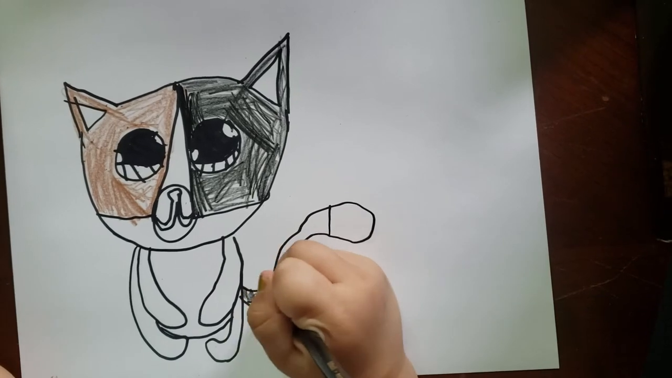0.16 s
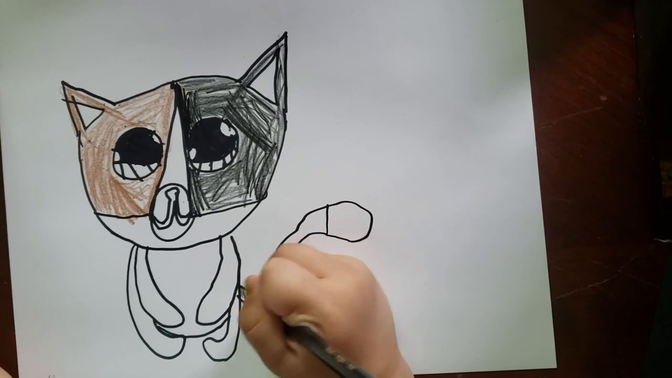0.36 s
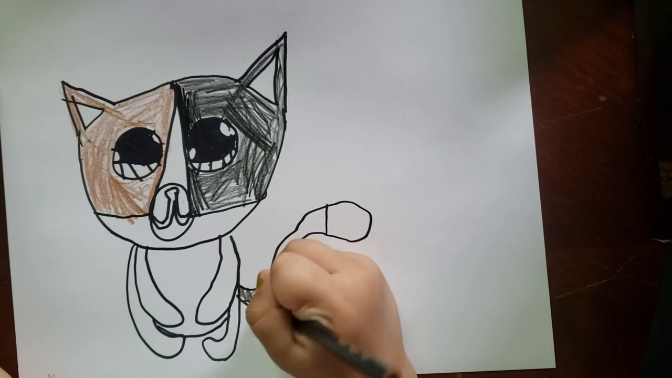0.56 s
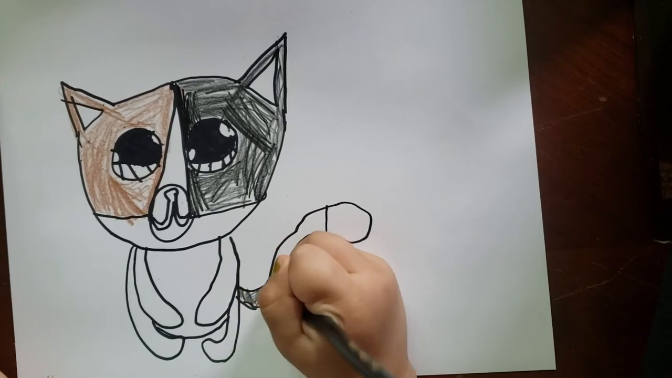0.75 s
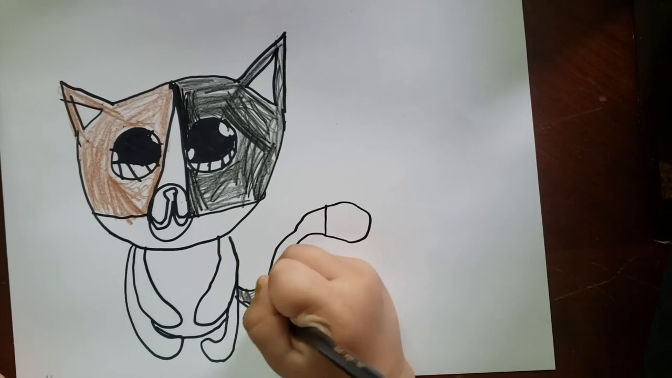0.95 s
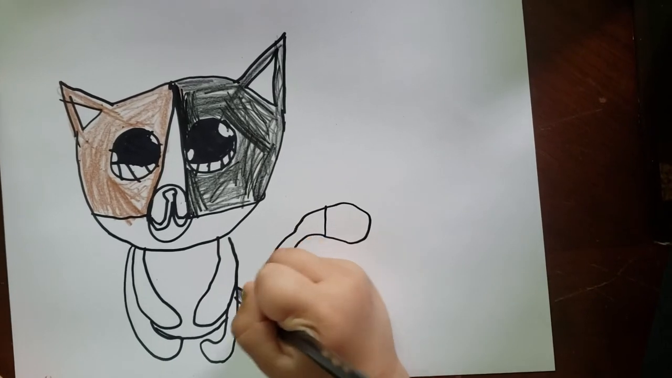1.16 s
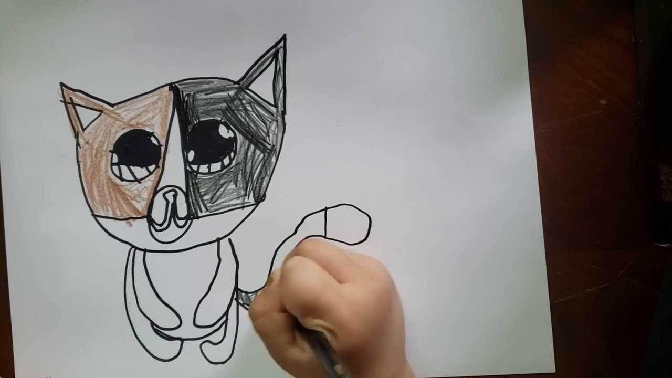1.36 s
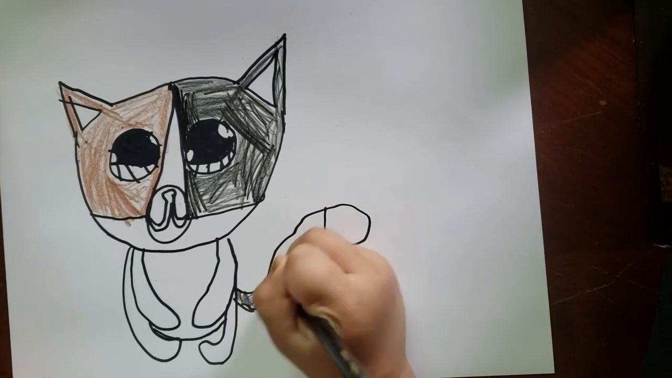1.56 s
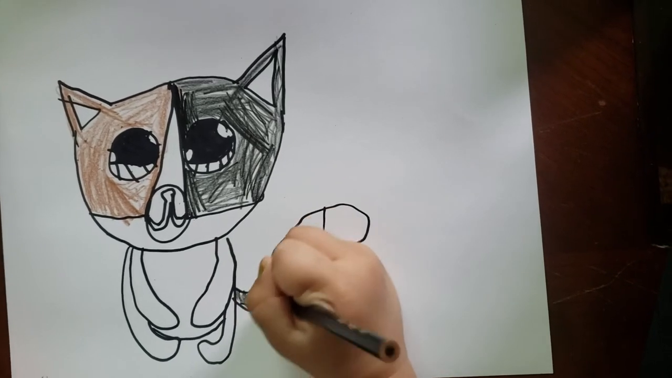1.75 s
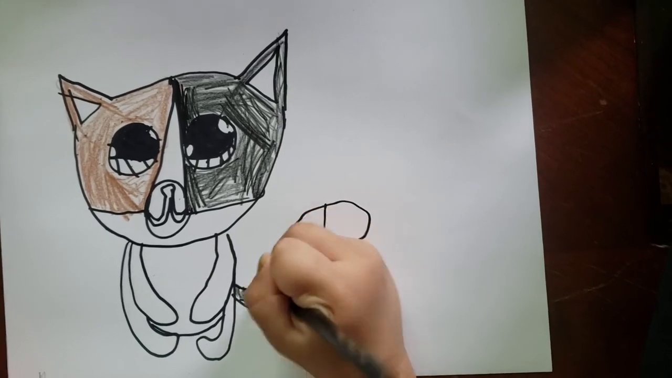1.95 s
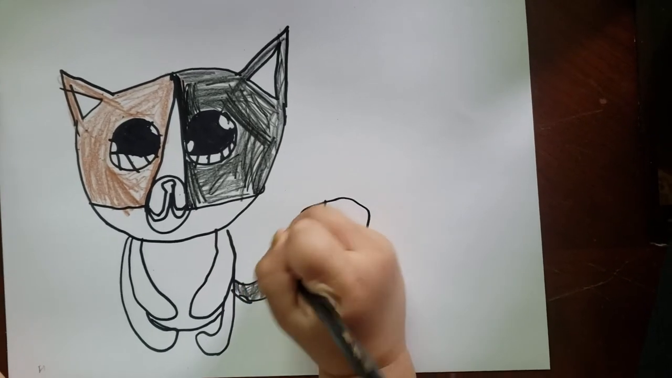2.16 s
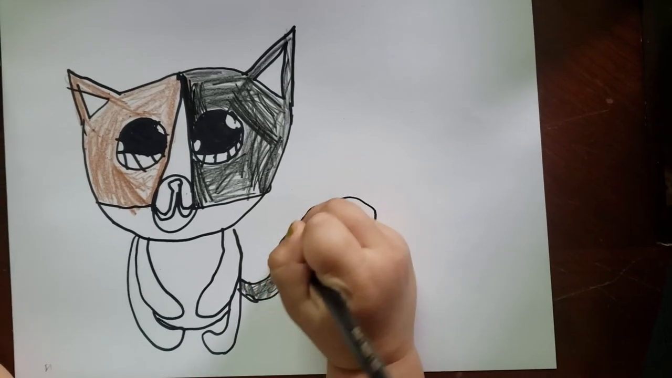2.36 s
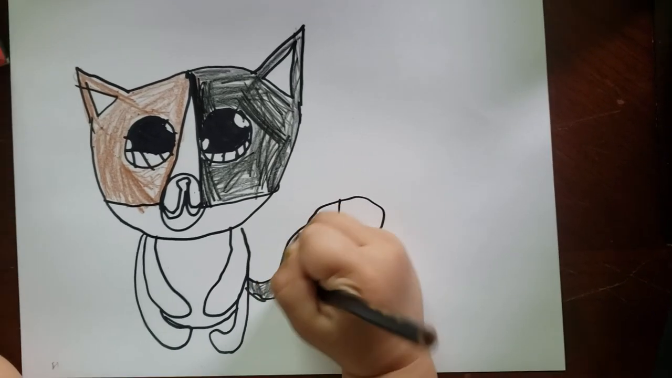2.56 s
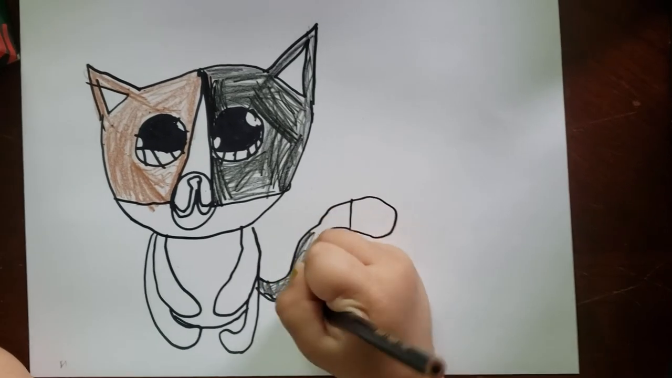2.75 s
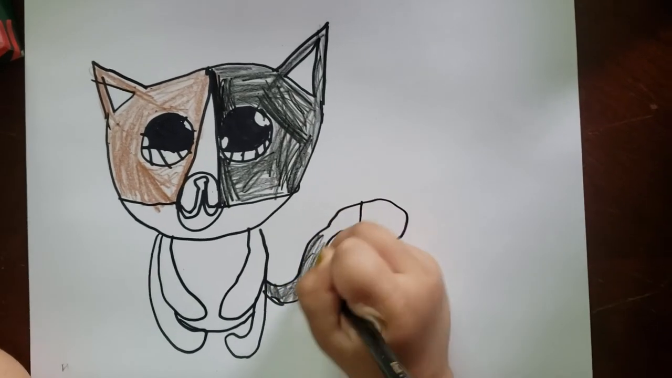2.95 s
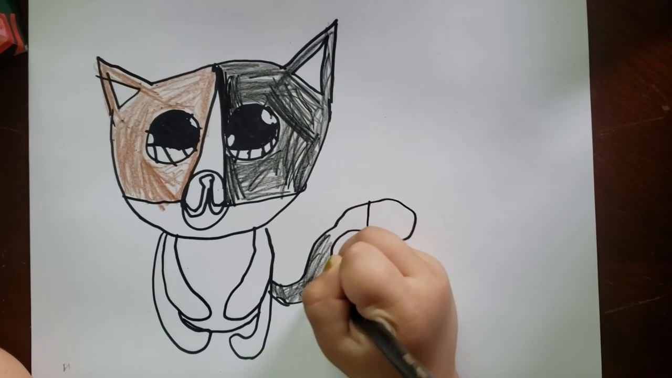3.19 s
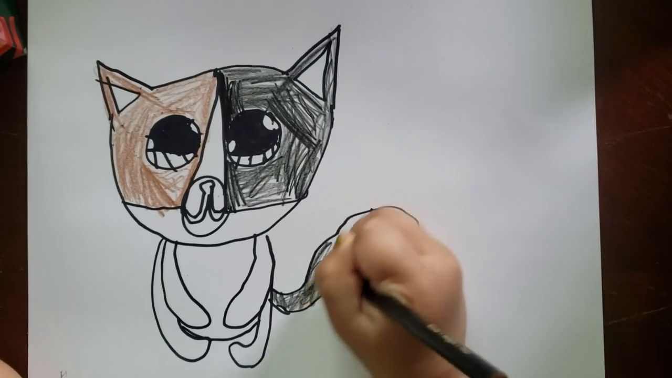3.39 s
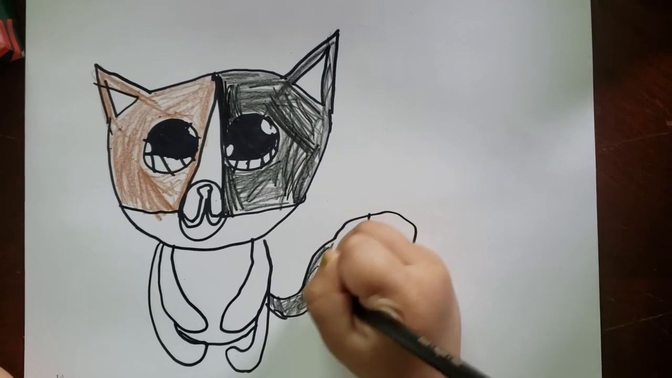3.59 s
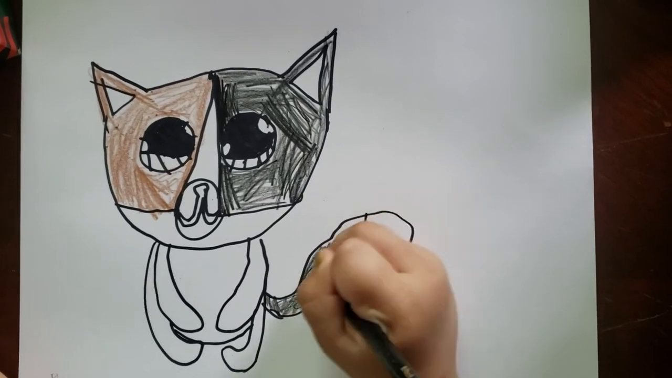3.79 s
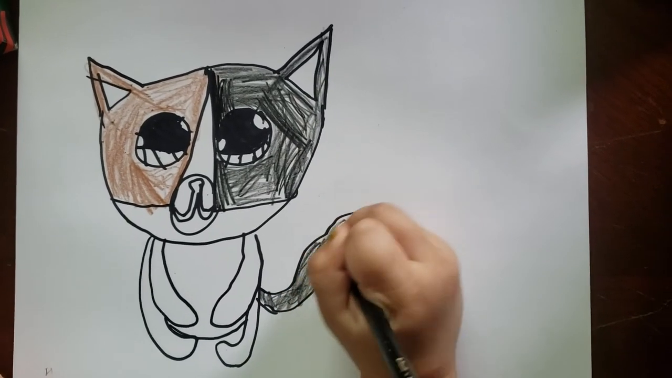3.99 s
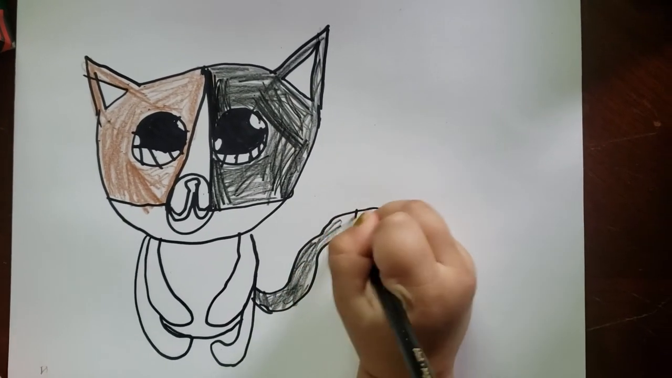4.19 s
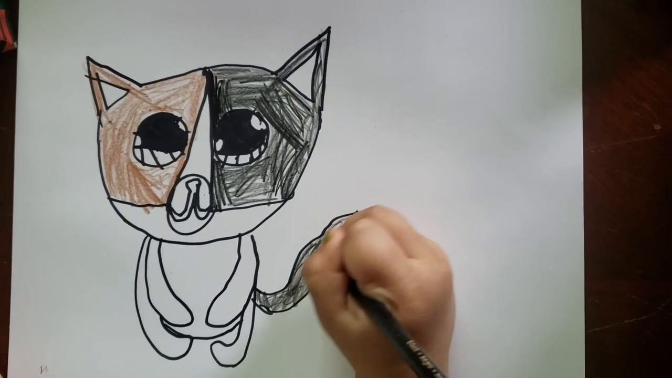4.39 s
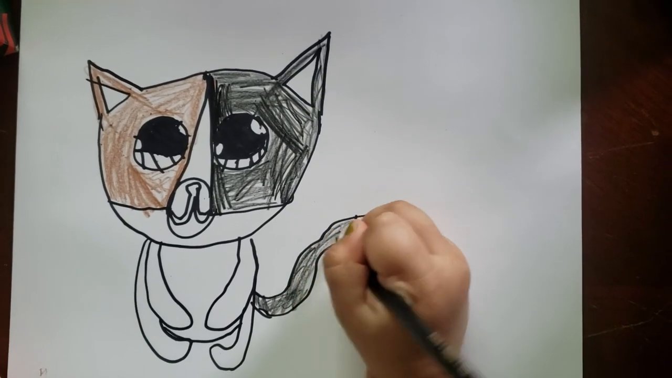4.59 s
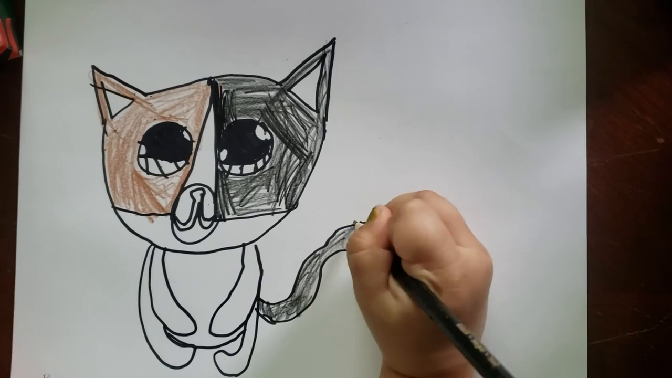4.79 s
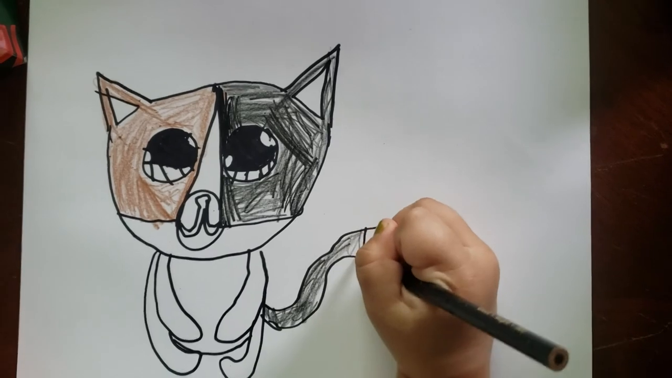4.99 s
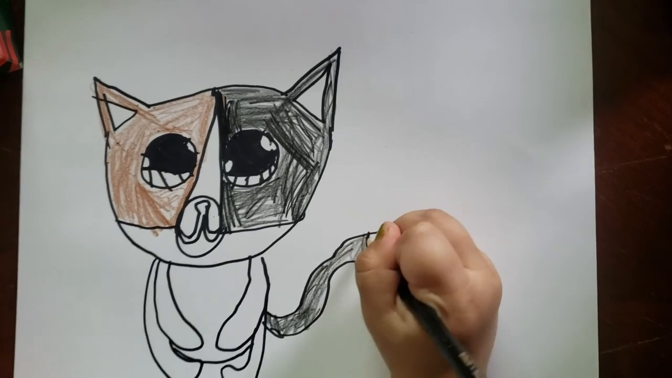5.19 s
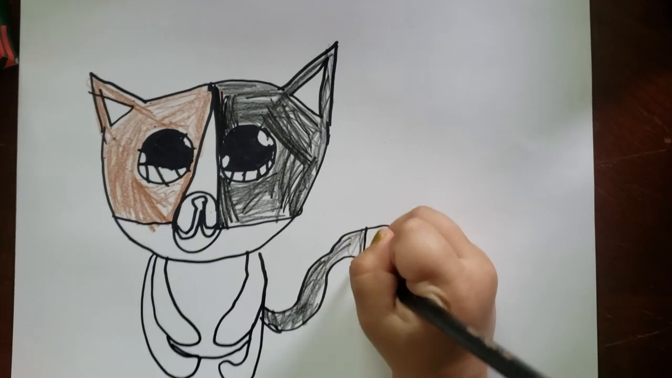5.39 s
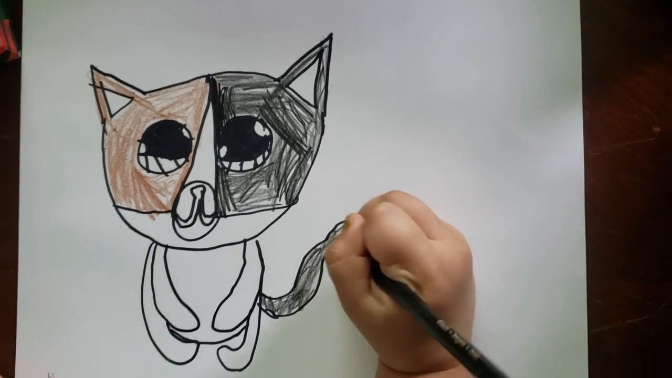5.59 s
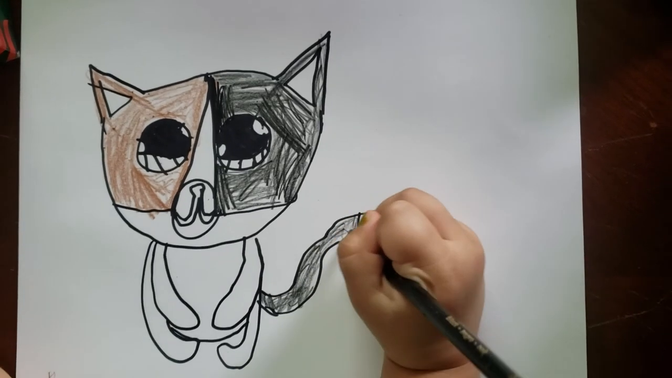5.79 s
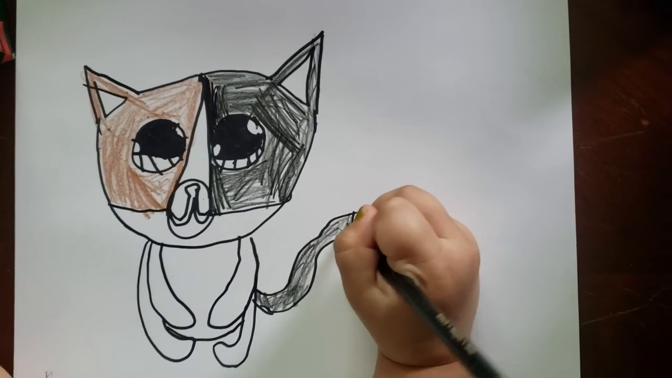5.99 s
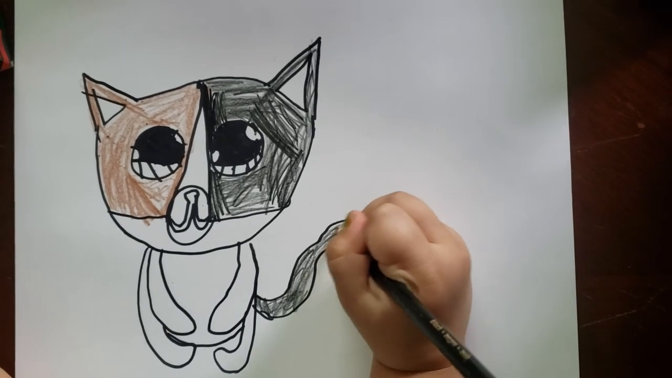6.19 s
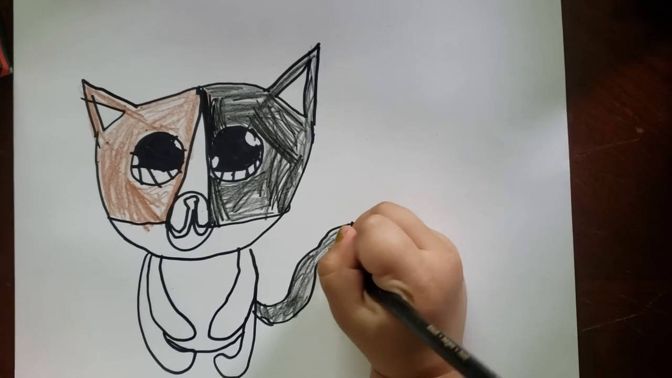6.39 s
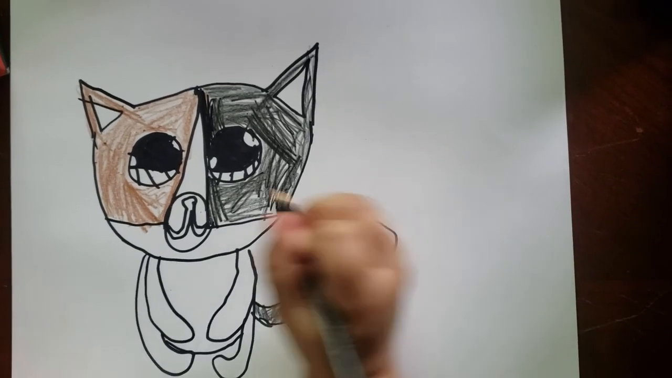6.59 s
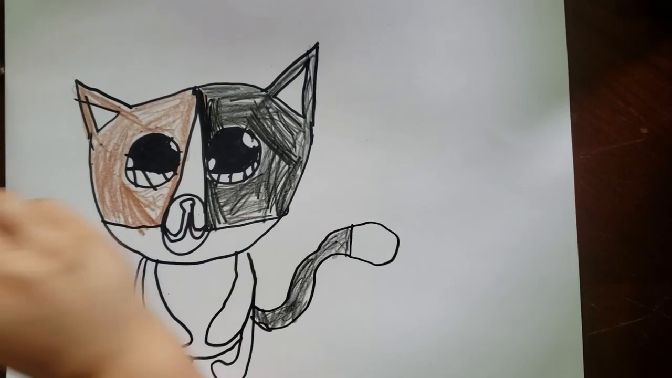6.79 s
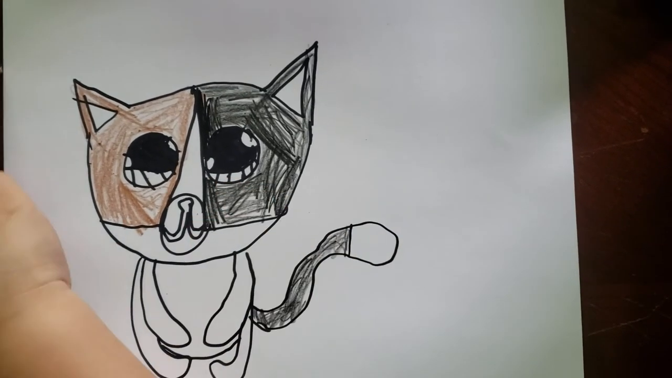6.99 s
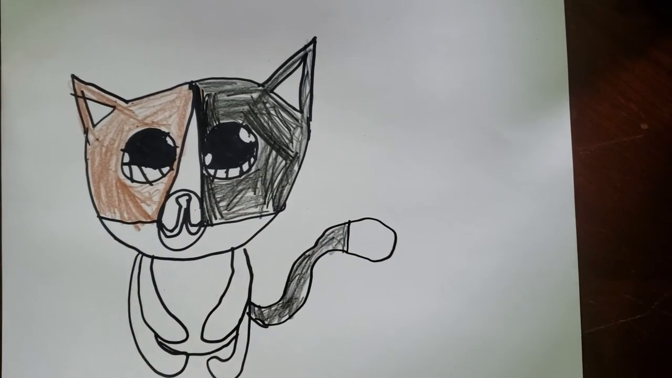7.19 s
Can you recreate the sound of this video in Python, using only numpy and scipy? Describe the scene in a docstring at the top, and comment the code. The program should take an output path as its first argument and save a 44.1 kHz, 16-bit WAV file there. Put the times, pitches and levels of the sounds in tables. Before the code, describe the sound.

A close stereo perspective on a wooden table in a small, lightly reverberant room. From 0 s, very faint, dry crayon strokes rub to and fro on paper, roughly eight per second, grainy and sizzling, with a narrow shaft rasp around 3 kHz. At about 1.0 s bright ticks snap, with a soft thump and a tiny rising creak until 1.1 s; duller table bumps follow near 1.4 s and a faint upward squeak at 1.7 s. Shading is firmer from 1.8 to 4.4 s, briefly weakening around 3.2 s, then lighter and slower. Low rumble and a muffled traffic-like rush swell, mostly between 2.5 and 4.2 s, over thin hiss. A soft little knock and scuff come at 5.2 s. Strokes stop at 6.73 s; a hand swishes quickly across the sheet, peaking near 6.85 s. At 7.11 s the crayon lands with a loud wooden crack and bright ring, bouncing at 7.19 and 7.24 s.

```python
"""A child shades a drawing with a pencil crayon in short back-and-forth strokes on a wooden table.
The tip snags on paper fibres and the held shaft rasps; ticks, bumps, a creak and a squeak join in.
A low room rumble is joined by a slowly swelling far rush, like traffic outside, over a faint hiss.
At the end the hand sweeps over the sheet and drops the crayon, which bounces and rings.
Most layers are shaped noise; the knocks, thuds and the ring of the crayon are fading sine waves."""
import sys
import numpy as np
from scipy import signal
from scipy.fft import rfft, irfft, next_fast_len
from scipy.io import wavfile

SR = 44100
rng = np.random.default_rng(int(sys.argv[2]) if len(sys.argv) > 2 else 0)


def store_wav(level_fs):
    """Save 16-bit WAV to argv[1]."""
    pcm = np.round(np.clip(np.atleast_2d(level_fs), -1, 1) * 32767)
    wavfile.write(sys.argv[1], SR, pcm.T.astype(np.int16))


N = 319725
TIME = np.arange(N) / SR   # seconds
LEFT_RIGHT = np.array([[1], [-1]])   # plus for the left side, minus for the right

# Strokes, push and pull in turn, each lasting until the next begins. Each row: start in seconds,
# relative level in dB, extra sizzle over body in dB, share of the stroke at which it is fastest.
STROKES = [(0.003, -59.0, 3.5, 0.53), (0.115, -69, 5.5, 0.33), (0.325, -66, 3.5, 0.49),
           (0.445, -65.0, 4.5, 0.61), (0.586, -68.5, 0, 0.56), (0.708, -73, 4, 0.85),
           (0.808, -69.5, -1, 0.51), (0.926, -63, -2, 0.66), (1.056, -64, 0, 0.49), (1.181, -62, -1.5, 0.6),
           (1.312, -61, 3, 0.59), (1.433, -65, -1.5, 0.55), (1.583, -62, -1, 0.68),
           (1.735, -60.5, -1.5, 0.49), (1.853, -58.5, -2.5, 0.71), (1.981, -57.5, -0.5, 0.45),
           (2.112, -60.0, -1, 0.64), (2.235, -59.0, 0.0, 0.48), (2.359, -59, -2.5, 0.58),
           (2.489, -60.0, -2.5, 0.36), (2.629, -61, -1.5, 0.97), (2.764, -56.0, 1.5, 0.31),
           (2.9, -59.5, -0.5, 0.55), (3.044, -58.5, -1.5, 0.42), (3.178, -67.5, -2, 0.49),
           (3.319, -69.5, -2.5, 0.36), (3.422, -59, -3.5, 0.59), (3.579, -62, -1.5, 0.48),
           (3.696, -57.5, -3, 0.73), (3.809, -56, -3, 0.48), (3.935, -59, -2.5, 0.42),
           (4.062, -60, -2, 0.42), (4.187, -60, -1, 0.99), (4.325, -58.5, -1.5, 0.55),
           (4.464, -64, -0.5, 0.7), (4.605, -66.5, -5, 0.95), (4.714, -67, -1, 0.43),
           (4.921, -69.5, -1, 0.41), (5.119, -78, -1.0, 0.57), (5.155, -69, -2, 0.34),
           (5.351, -69.5, 0, 0.46), (5.523, -68, 1, 0.51), (5.77, -66, 3, 0.45), (5.868, -65.0, 1, 0.61),
           (5.992, -65.5, 2, 0.54), (6.095, -69.5, -2, 0.62), (6.244, -77.5, -2, 0.38),
           (6.397, -76.5, -5, 0.5), (6.568, -67.5, 1, 0.7)]
LIFT_OFF_S = 6.73   # the last stroke ends
# How alike sound from all round is on the two sides. Each row: frequency in Hz, coherence (1 = alike).
LIKENESS = [(30, 0.9), (120, 0.98), (290, 0.94), (640, 0.064), (1400, 0.013), (14000, 0.079)]


def from_db(db):
    """Turn decibels into a gain."""
    return 10 ** (np.asarray(db) / 20)


def rms_one(x):
    """Scale a sound to an average power of one."""
    return x / np.sqrt(np.mean(x ** 2) + 1e-20)


def in_time(rows):
    """Read each column of a curve at every sample, joining its points with straight lines."""
    seconds, *columns = np.transpose(rows)
    return [np.interp(TIME, seconds, column) for column in columns]


def at_hz(points, hz):
    """Read a curve over frequency, with the frequencies spaced as the ear hears them (log axis)."""
    f, value = np.transpose(points)
    return np.interp(np.log(np.maximum(hz, 1)), np.log(f), value)


def filtered(x, gain):
    """Apply a gain given as a function of frequency."""
    size = next_fast_len(N + SR // 10)
    hz = np.arange(size // 2 + 1) * SR / size
    return irfft(rfft(x, size) * gain(hz), size)[..., :N]


def coloured(x, spectrum):
    """Give a white signal a spectrum and an average power of one."""
    return rms_one(filtered(x, lambda hz: from_db(at_hz(spectrum, hz))))


def drift(rate):
    """Wander by chance along straight lines, with so many new points a second; rms 1."""
    knots = rng.standard_normal(N // 20)
    return rms_one(np.interp(TIME * rate, np.arange(len(knots)), knots))


def resonance(f, hz, width_hz):
    """Bell-shaped gain of a resonance, 1 on top and half at half the width to either side."""
    return 1 / (1 + (2 * (f - hz) / width_hz) ** 2)


def resonant_noise(hz, width_hz):
    """Send noise through a resonance; rms 1."""
    return rms_one(filtered(rng.standard_normal(N), lambda f: resonance(f, hz, width_hz)))


def gliding_noise(hz, width_hz):
    """Make noise in a resonance whose centre moves; rms 1."""
    a, b = filtered(rng.standard_normal((2, N)), lambda f: resonance(f, 0, width_hz))
    phase = 2 * np.pi * np.cumsum(hz) / SR
    return rms_one(a * np.cos(phase) + b * np.sin(phase))


def scattered(likeness):
    """White noise from a spread-out source, only partly alike at the two microphones."""
    share = np.clip(likeness, 0, 1)
    common = np.sqrt(share) * rng.standard_normal(N)
    return common + np.sqrt(1 - share) * rng.standard_normal((2, N))


def diffuse(spectrum):
    """Noise from all round: alike on both sides in the bass, nearly unrelated in the treble."""
    def gain(hz):
        likeness = np.clip(at_hz(LIKENESS, hz), -1, 1)
        return from_db(at_hz(spectrum, hz)) * np.sqrt(1 + likeness * LEFT_RIGHT)
    mid, side = filtered(rng.standard_normal((2, N)), gain)
    return rms_one(np.array([mid + side, mid - side]))


def placed(x, pan_db, lag_ms):
    """Place a sound by level (left over right) and by delay of the left side (negative: earlier)."""
    lag_s = np.array([[lag_ms], [0]]) / 1000
    pair = filtered(x, lambda hz: np.exp(-2j * np.pi * hz * lag_s))
    return pair * from_db(pan_db * LEFT_RIGHT / 2)


def decay(s, t60, attack_s):
    """Envelope that rises at s and then falls by 60 dB in t60 seconds."""
    out, start = np.zeros(N), int(s * SR)
    t = TIME[:min(SR // 4, N - start)]
    out[start:start + len(t)] = np.minimum(t / attack_s, 1) * from_db(-60 * t / t60)
    return out


def swell(start_s, peak_s, rise_db_per_s, release_s, attack_s=0.0046):
    """A rub sets in, grows steadily louder and is cut short as the contact lifts."""
    onset = np.clip((TIME - start_s) / attack_s, 0, 1)
    rise = rise_db_per_s * (TIME - peak_s)
    fall = -60 * (TIME - peak_s) / release_s
    return onset * from_db(np.maximum(np.minimum(rise, fall), -120))


def struck(s, modes, spread_db):
    """One blow rings every mode as a fading sine wave, with a strength of its own."""
    out, start = np.zeros(N), int(s * SR)
    t = TIME[:min(SR // 3, N - start)]
    for hz, db, t60 in modes:
        strength_db = db + spread_db * rng.standard_normal()
        out[start:start + len(t)] += from_db(strength_db - 60 * t / t60) * np.sin(2 * np.pi * hz * t)
    return out


def background(rumble_db=1.5, rush_db=2.5, hiss_db=-76, waver_db=0.66, rush_waver_db=1.28):
    """Wavering room rumble, the far rush and a faint even hiss, all noise from all round."""
    # Courses of loudness. Each row: time in seconds, level in dB before the shift set above.
    rumble_course = [(0, -67.5), (.7, -61), (2.4, -60.5), (2.9, -57), (4.2, -55.5), (5.6, -56.5),
                     (7.1, -54)]
    rush_course = [(0, -83.5), (.9, -84.5), (2.75, -72.5), (3.6, -72), (4.2, -64), (5.9, -65), (7.1, -65)]
    # Colours of the three noises. Each row: frequency in Hz, relative level in dB per Hz.
    rumble_colour = [(20, -12), (50, -13.5), (66, -4), (88, 3), (100, -10.5), (116, 4.5), (150, -7.5),
                     (190, -5), (235, -7.5), (330, -17.5), (470, -26.5), (900, -59.5)]
    rush_colour = [(150, -8.5), (350, 2), (700, 3), (1150, 1.5), (1450, -4), (1800, -3), (2100, -11),
                   (2500, -24.5), (4000, -43)]
    hiss_colour = [(300, 8), (1000, -1), (2400, -0.5), (3000, -1.5), (4500, -6), (5900, -10.5), (6450, 6),
                   (7300, -11), (8800, -17), (10500, -6.5), (12300, 1), (14500, -0.5)]
    rumble_level_db = in_time(rumble_course)[0] + rumble_db + waver_db * drift(6.8)
    rumble = from_db(rumble_level_db) * diffuse(rumble_colour)
    rush_level_db = in_time(rush_course)[0] + rush_db + rush_waver_db * drift(20)
    rush = from_db(rush_level_db) * diffuse(rush_colour)
    hiss = from_db(hiss_db) * diffuse(hiss_colour)
    return rumble + rush + placed(hiss, pan_db=1.0, lag_ms=0)


def hand_motion(turn_speed=0.17):
    """Pushes and pulls alternate, slowest on each turn, where the tip loops round at turn_speed.

    Gives stroke number and speed (about 1 at its fastest)."""
    starts, _, _, fastest = np.transpose(STROKES)
    turns = np.r_[starts, LIFT_OFF_S]
    fastest_s = starts + np.clip(fastest, 0, 1) * np.diff(turns)
    moments = np.sort(np.r_[turns, fastest_s])
    progress = np.interp(TIME, moments, np.arange(len(moments)) / 2)   # grows by 1 a stroke
    speed = np.hypot(np.sin(np.pi * progress), turn_speed) * (TIME < LIFT_OFF_S)
    return np.minimum(progress.astype(int), len(STROKES) - 1), speed


def contact(ease_s=0.049, bite_s=.008, ease_db=-13):
    """On some turns the tip eases off the paper, then bites again abruptly."""
    # Moments, in seconds, at which the tip is back in the paper.
    bites = [0.021, 2.008, 2.256, 2.51, 2.788, 3.846, 4.354, 4.644, 5.202, 5.38, 5.591]
    eased = sum(np.interp(TIME, [s - ease_s, s - bite_s, s], [0, 1, 0]) for s in bites)
    return from_db(ease_db * np.sqrt(eased))


def near_echoes(x, count=4, echo_db=-13, sway_s=.00004):
    """Table, hand and fingers reflect within a few milliseconds; the delays sway as the hand moves."""
    out, samples = x.copy(), np.arange(N)
    for side in range(2):
        swaying = np.interp(samples - sway_s * SR * drift(8), samples, x[side])
        for lag in (rng.uniform(0.000598, .004, count) * SR).astype(int):
            out[side, lag:] += from_db(echo_db) * swaying[:N - lag]
    return out / np.sqrt(1 + count * from_db(echo_db) ** 2)   # keep the power about the same


def shaft_rasp(pulling, grip):
    """The held shaft adds a narrow rasp, lower and stronger on a push, wandering with the grip."""
    push_hz, pull_hz, width_hz, wander_hz = 2950, 3120, 420, 80
    push_db, pull_db, spread_db = -14.5, -17.5, 1.5   # against the rub; spread from stroke to stroke
    hz = np.where(pulling, pull_hz, push_hz) + wander_hz * drift(10)
    level_db = np.where(pulling, pull_db, push_db) + spread_db * grip
    return gliding_noise(hz, width_hz) * from_db(level_db)


def shading(sharpness=1.17, grain_db=1.0, grip_db=1.5, level_db=0.57, sizzle_hz=10800, wander_db=0.7):
    """The tip snags on paper fibres at a rate that follows its speed, slowing at each turn."""
    # Colour of the tip rubbing on paper. Each row: frequency in Hz, relative level in dB per Hz.
    rub_colour = [(300, 2), (900, -14), (1900, -3.5), (2500, -10.5), (2950, -9), (3500, -6.5),
                  (4500, -13.5), (5300, -8), (5800, -5.5), (6400, -4.5), (7600, -2), (8200, -6),
                  (10000, -7.5), (11200, -4), (12200, 3.5), (14500, 3.5)]
    _, db, sizzle_db, _ = np.transpose(STROKES)
    stroke, speed = hand_motion()
    grip = rng.standard_normal(len(db))[stroke]
    pressure = from_db(db[stroke] + grip_db * drift(90)) * contact()
    # up to 12000 snags a second, of uneven strength
    snags = rng.random(N) < 12000 * speed / SR
    snags = snags * from_db(grain_db * np.minimum(rng.exponential(1, N), 4))
    # the whole sheet radiates, so each snag reaches each side with its own strength
    rub = coloured(snags * scattered(likeness=0.16), rub_colour)
    # the edge of the tip sizzles, its flat rubs duller; the tip rocks between strokes and within them
    sizzle = filtered(rub, lambda hz: 1 / (1 + (sizzle_hz / np.maximum(hz, 1)) ** 10))
    body = rub - sizzle
    edge = from_db((sizzle_db[stroke] + wander_db * drift(32)) / 2)
    rasp = placed(shaft_rasp(stroke % 2, grip) * speed, pan_db=0.5, lag_ms=-0.051)
    rub = near_echoes(sizzle * edge + body / edge + rasp)
    return placed(from_db(level_db) * rub * pressure * speed ** sharpness, pan_db=-2.5, lag_ms=0.159)


def ticks(t60=0.011, ring_cycles=26, rise_cycles=3):
    """The tip catches and lets go with a short snap; low snaps start softer and ring longer."""
    # Each row: start in seconds, level in dB, centre frequency in Hz.
    snaps = [(1.0052, -45, 12500), (1.006, -57, 3100), (1.006, -53, 5300), (1.0071, -46, 11100),
             (1.008, -34, 12100), (1.016, -44, 12500), (1.0216, -44, 11600), (1.074, -46, 12100),
             (1.076, -54, 11100), (1.08, -47, 12000), (1.083, -55, 11100), (5.202, -68, 12000)]
    out, t = np.zeros(N), TIME[:SR // 10]
    f = np.arange(len(t) // 2 + 1) * SR / len(t)
    for s, db, hz in snaps:
        noise = rfft(rng.standard_normal(len(t)))
        snap = rms_one(irfft(noise * resonance(f, hz, hz / 2), len(t)))
        rise = np.minimum(t * hz / rise_cycles, 1)
        start = int(s * SR)
        out[start:start + len(t)] += snap * rise * from_db(db - 60 * t / (t60 + ring_cycles / hz))
    return placed(out, pan_db=-6.0, lag_ms=0.274)


def table_thud(s, low_hz=150, top_hz=600):
    """A blow rings the table top, which radiates little deep bass."""
    # Modes of the table top. Each row: frequency in Hz, level in dB, t60 in seconds.
    table_modes = [(188, -9.5, 0.153), (225, -4, 0.048), (300, -5.5, 0.094), (353, 2, 0.026),
                   (455, -9.5, 0.03), (640, -14, .03), (850, -10, 0.027)]
    band = signal.butter(2, [low_hz, top_hz], "band", fs=SR, output="sos")
    return signal.sosfilt(band, struck(s, table_modes, spread_db=1.0) + 1e-18)


def bumps(low_hz=150, attack_s=0.0029, damped_t60=0.088):
    """Blows of the hand ring the table top and damp it at once; each reaches up to its own edge."""
    # Each row: start in seconds, level in dB, upper edge in Hz.
    blows = [(1.006, -49, 280), (1.022, -48, 250), (1.367, -40.5, 237), (1.382, -45, 337),
             (1.408, -56, 747)]
    thuds = 0
    for s, db, top_hz in blows:
        thuds = thuds + from_db(db) * table_thud(s, low_hz, top_hz) * decay(s, damped_t60, attack_s)
    return placed(thuds, pan_db=0.5, lag_ms=0.091)


def creak(grit_db=-3, slips_per_s=900, slip_t60=.003, level_db=-65.5):
    """The dragging tip slips in quick uneven jerks and excites the resonances of the held crayon."""
    # Each row: frequency in Hz, width in Hz, level in dB.
    creak_modes = [(840, 460, -3.5), (2180, 410, -5.5), (4000, 2800, -14), (11000, 600, -4)]
    tone = sum(from_db(db) * resonant_noise(hz, width_hz) for hz, width_hz, db in creak_modes)
    # every slip is a sudden jump that dies away within milliseconds
    jumps = (rng.random(N) < slips_per_s / SR) + 1e-18
    slips = signal.lfilter([1], [1, -from_db(-60 / (slip_t60 * SR))], jumps)
    grit = from_db(grit_db) * rms_one(slips * resonant_noise(13000, 9000))
    envelope = swell(start_s=1.01, peak_s=1.072, rise_db_per_s=25, release_s=0.036)
    return placed(from_db(level_db) * envelope * (tone + grit), pan_db=-5.5, lag_ms=0.38)


def squeak(width_hz=130):
    """A faint, narrow squeak of gliding noise that holds its pitch and then bends upward."""
    # Each row: time in seconds, pitch in Hz, level in dB.
    course = [(1.68, 1150, -95), (1.705, 1130, -74), (1.722, 1154, -73), (1.738, 1516, -80),
              (1.76, 1600, -95)]
    hz, db = in_time(course)
    sounding = (TIME > course[0][0]) & (TIME < course[-1][0])
    return placed(sounding * from_db(db) * gliding_noise(hz, width_hz), pan_db=3, lag_ms=0)


def soft_knock(start_s=5.202, knock_db=-54.5, scuff_db=-63, scuff_t60=0.19):
    """A soft little knock rings a few short, close modes and trails off in a scuff of noise."""
    # Each row: frequency in Hz, level in dB, t60 in seconds.
    knock_modes = [(1120, -2, 0.1), (1180, 1, 0.057), (1309, -2, 0.036), (1630, -14, .03)]
    # Each row: frequency in Hz, relative level in dB per Hz.
    scuff_colour = [(600, -11), (1150, 5), (1700, -8), (2300, -19), (3000, -13), (4500, -26)]
    knock = from_db(knock_db) * struck(start_s, knock_modes, spread_db=2.5)
    scuff = from_db(scuff_db) * coloured(rng.standard_normal(N), scuff_colour)
    return placed(knock + scuff * decay(start_s, scuff_t60, attack_s=0.0044), pan_db=0, lag_ms=0)


def sweep(level_db=-56.5):
    """Skin brushes across the paper, louder and louder until the hand lifts."""
    # Each row: frequency in Hz, relative level in dB per Hz.
    sweep_colour = [(500, -1), (3000, -10.5), (7000, -3), (10000, -10.5), (14500, 1)]
    envelope = swell(start_s=6.73, peak_s=6.845, rise_db_per_s=155, release_s=0.092)
    return from_db(level_db) * envelope * coloured(scattered(likeness=0.17), sweep_colour)


def dropped_crayon(crack_t60=0.019, crack_attack_s=0.00063, echo_s=.016, echo_db=-11):
    """Each landing cracks, rings the wooden shaft and thuds in the table; a nearby wall throws it back."""
    first_bounce_s = 7.15
    # The crayon lands on one end, then the other. Each row: start in seconds, crack level in dB,
    # ring level in dB, thud level in dB, left over right in dB.
    landings = [(7.107, -14.5, -33, -43.5, -3), (7.1108, -13.5, -30.5, -32.5, 2.5),
                (7.19, -18.5, -35, -45, 5), (7.1921, -20, -26.5, -39, -4), (7.2402, -21, -44, -48, -5),
                (7.2411, -31, -29.5, -50, -2)]
    # Modes of the crayon, which weigh differently as it lands flat or skips on its ends. Each row:
    # frequency in Hz, level in the first fall in dB, level in the bounces in dB, t60 in seconds.
    crayon_modes = [(1970, -16, -26, .2), (2135, 0, -8, 0.035), (2400, -15, -12, 0.031),
                    (2770, -12, -9.5, 0.033), (3380, -11, -2.5, 0.039), (4090, -6, -5, .025),
                    (4310, -20, -25, .16), (4600, -19, -14, 0.045), (4860, -8, -14, .035),
                    (6020, -13, -4, 0.051), (6280, 6, 0.5, 0.04), (7230, 1, -14, .022),
                    (7670, -22, -16, .06), (9050, 0, -20, 0.021), (11970, -16, -10, 0.035),
                    (12520, -8, 0, 0.021)]
    # Crack of wood on wood, in the first fall and in the lighter bounces. Each row: frequency in Hz,
    # relative level in dB per Hz.
    fall_colour = [(100, -28), (280, -1.5), (700, -1), (1150, -9.5), (1750, -1), (2150, 3), (2600, 4.5),
                   (3100, -1), (4200, 5.5), (4950, 7), (5450, -10), (6200, 6.5), (6700, 0.5), (7250, 11.5),
                   (7800, -12), (8500, -14), (9120, 9), (9600, -5), (10200, -11), (11400, 2), (12000, -4),
                   (12600, 4), (14500, -16)]
    bounce_colour = [(100, -24), (300, -6), (900, -15.5), (2100, 7.5), (2800, -3.5), (4100, 9), (4600, -2),
                     (6100, 9.5), (7000, 5), (8600, -9), (9300, 3), (10600, -6), (12400, 8), (13400, -5),
                     (14500, -1)]
    # The spot where it lands, heard on two sides. Each row: frequency in Hz, left over right in dB.
    spot_balance = [(700, 1.5), (1300, -3.5), (2100, 3), (3100, -4), (4150, 11.5), (5000, -5), (5700, 1.5),
                    (7300, 3.5), (9100, -9.5), (11200, 2), (12600, -8), (14000, 3)]
    fall_crack = coloured(scattered(likeness=0.67), fall_colour)
    bounce_crack = coloured(scattered(likeness=0.67), bounce_colour)
    hits, thuds = 0, 0
    for s, crack_db, ring_db, thud_db, pan_db in landings:
        first = s < first_bounce_s
        modes = [(hz, fall_db if first else bounce_db, t60) for hz, fall_db, bounce_db, t60 in crayon_modes]
        crack = (fall_crack if first else bounce_crack) * decay(s, crack_t60, crack_attack_s)
        ring = struck(s, modes, spread_db=1.5)
        hit = from_db(crack_db) * crack + from_db(ring_db) * ring
        hits = hits + hit * from_db(pan_db * LEFT_RIGHT / 2)
        thuds = thuds + from_db(thud_db) * table_thud(s, top_hz=960)
    hits = filtered(hits, lambda hz: from_db(at_hz(spot_balance, hz) * LEFT_RIGHT / 2))

    def wall(hz):   # a delay with a duller treble
        return from_db(echo_db) * np.exp(-2j * np.pi * hz * echo_s) / (1 + (hz / 8000) ** 4)
    echo = filtered(hits[::-1], wall)   # left and right change places
    return placed(hits, pan_db=-1.0, lag_ms=0.36) + placed(echo, pan_db=4, lag_ms=0) + thuds


def room(x, early_db=7, early_s=0.11, first_wall_s=0.0083):
    """Strong early reflections, then a tail that dies sooner in the treble; its bass is alike on both sides."""
    # Each row: frequency in Hz, t60 of the room in seconds.
    room_t60 = [(100, 0.41), (2000, 0.67), (6000, 0.23), (14000, 0.25)]
    t, tail = TIME[:SR * 2 // 3], 0
    edges = np.geomspace(80, 16000, 9)
    for low, high in zip(edges, edges[1:]):
        hz = np.sqrt(low * high)
        noise = scattered(at_hz(LIKENESS, hz))[:, :len(t)]
        band = signal.sosfilt(signal.butter(2, [low, high], "band", fs=SR, output="sos"), noise)
        tail = tail + band * from_db(-60 * t / at_hz(room_t60, hz))
    tail = tail * (t > first_wall_s) * (1 + from_db(early_db) * np.exp(-t / early_s))
    return signal.fftconvolve(x, rms_one(tail) / np.sqrt(len(t)), axes=1)[:, :N]


def scene(rub_room_db=-6.0, knock_room_db=-9.0, drop_room_db=-10.0):
    """Everything on the table sounds in the room, over the background."""
    rubbing = shading() + creak() + squeak() + sweep()
    knocks = ticks() + bumps() + soft_knock()
    drop = dropped_crayon()
    into_room = from_db(rub_room_db) * rubbing + from_db(knock_room_db) * knocks
    into_room = into_room + from_db(drop_room_db) * drop
    return rubbing + knocks + drop + room(into_room) + background()


def record(dry, cutoff_hz=14600):
    """The left side favours parts of the middle, the right most of the treble; the top is cut steeply."""
    # Left microphone against right. Each row: frequency in Hz, left over right in dB.
    balance = [(200, 0.5), (400, 5.5), (800, -0.5), (1300, 3), (1900, 6.5), (2500, -3), (3300, 1),
               (4200, -5.5), (5600, -5), (7400, -9), (9400, -2.5), (12300, -2), (14500, -5)]
    pair = filtered(dry, lambda hz: from_db(at_hz(balance, hz) * LEFT_RIGHT / 2))
    return signal.sosfilt(signal.ellip(12, .1, 80, cutoff_hz, fs=SR, output="sos"), pair)


dry = scene()
out = record(dry)
store_wav(out)
```